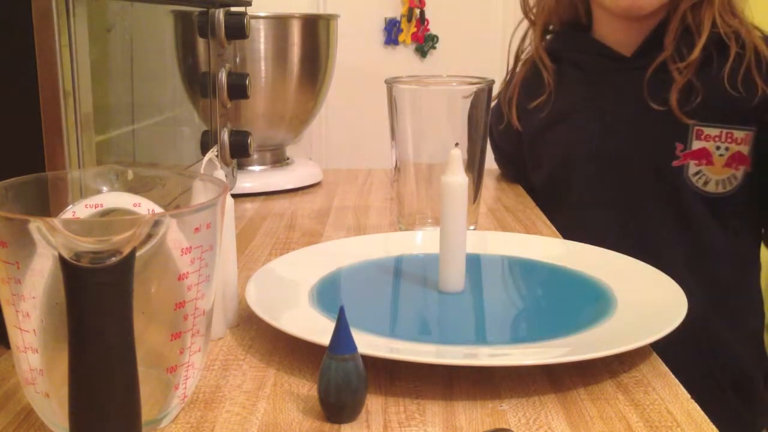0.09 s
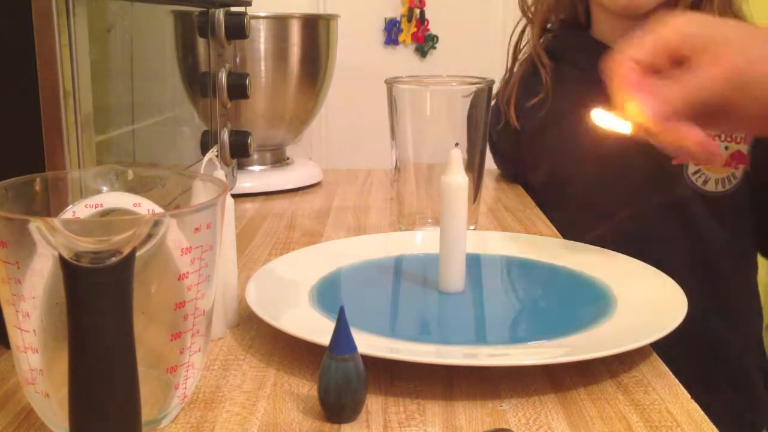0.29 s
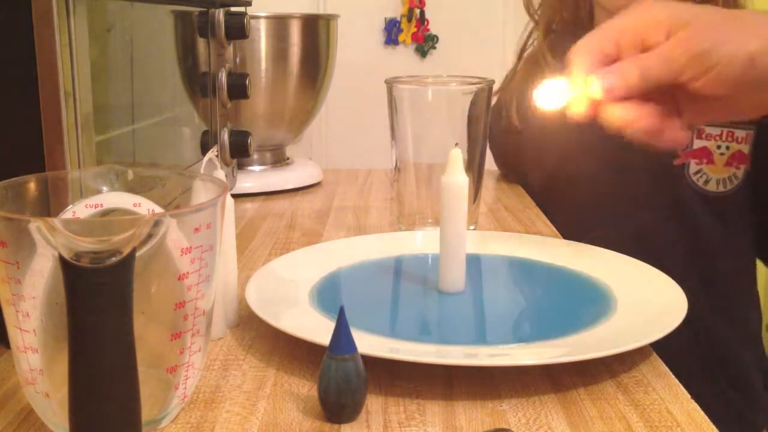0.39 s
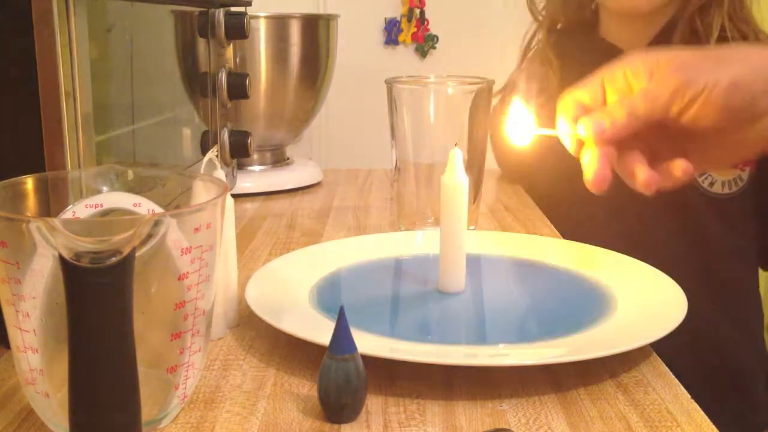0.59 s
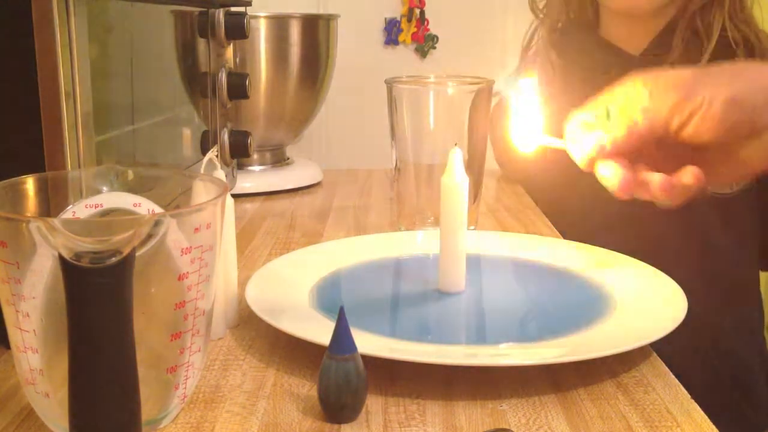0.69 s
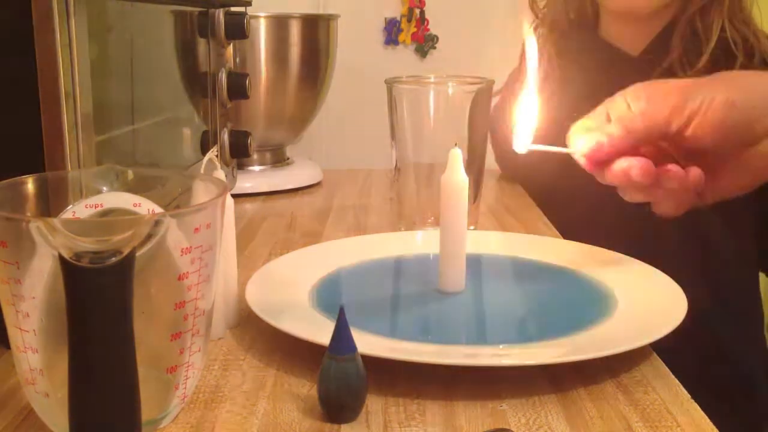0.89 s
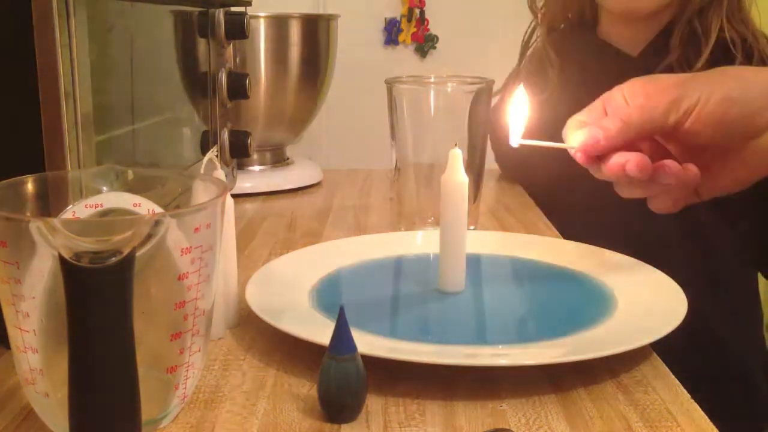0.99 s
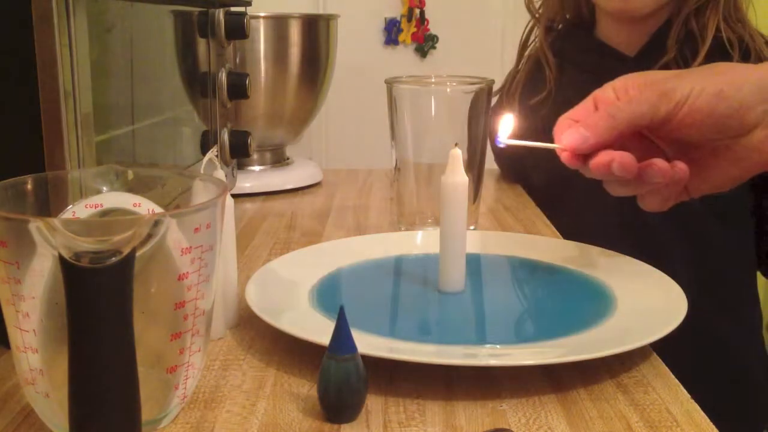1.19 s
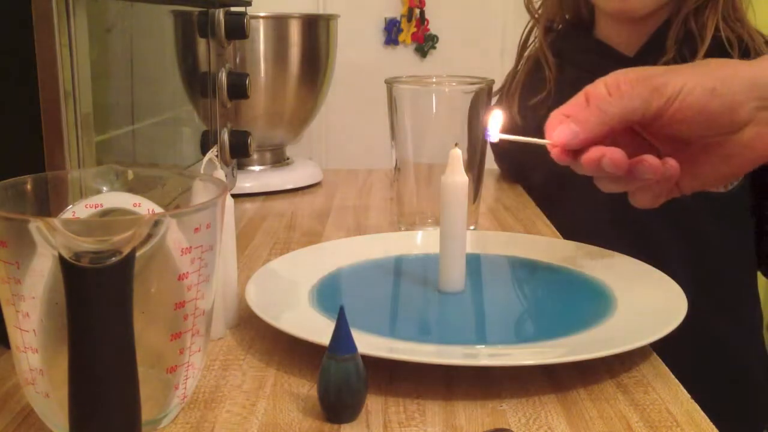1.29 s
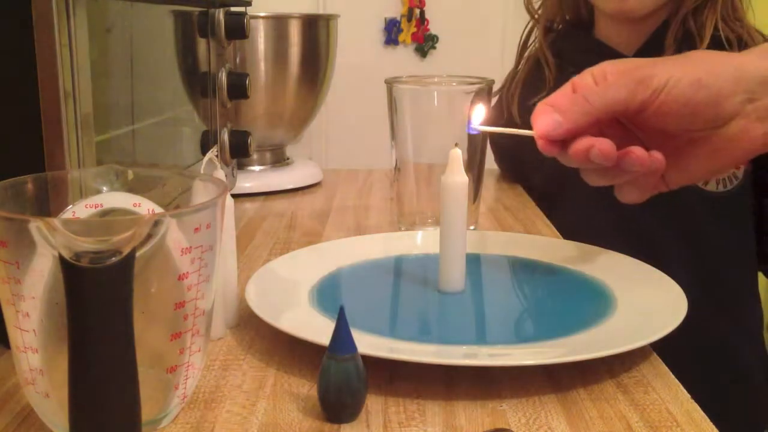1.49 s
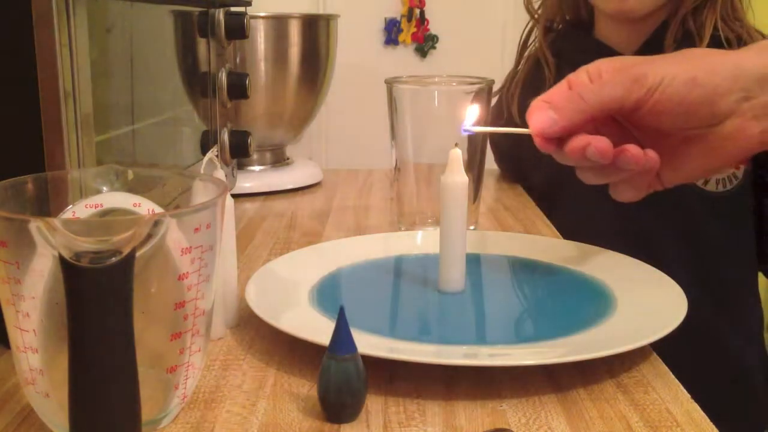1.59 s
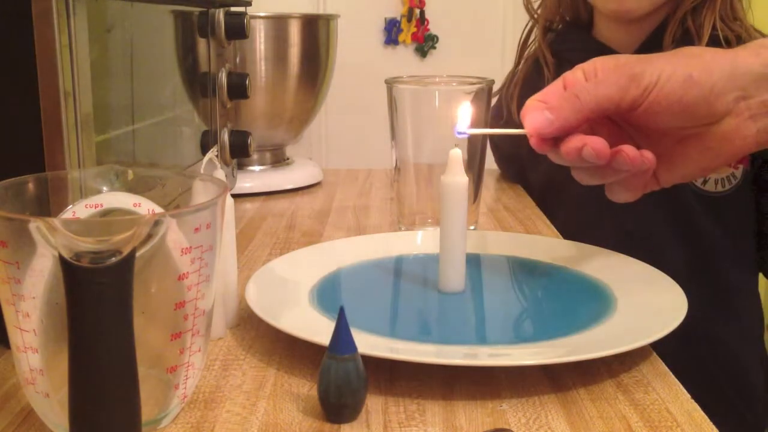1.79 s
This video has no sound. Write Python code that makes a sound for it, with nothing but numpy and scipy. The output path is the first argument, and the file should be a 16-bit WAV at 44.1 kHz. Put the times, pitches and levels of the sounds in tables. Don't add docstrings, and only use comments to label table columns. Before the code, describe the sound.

A match is struck with a quick gritty scratch, snaps alight and hisses briefly in a kitchen

```python
import sys
import numpy as np
from scipy import signal
from scipy.fft import rfft, irfft
from scipy.io import wavfile
from scipy.ndimage import uniform_filter1d

SR = 44100
rng = np.random.default_rng(int(sys.argv[2]) if len(sys.argv) > 2 else 0)


def generate_wav(sig):
    pcm = np.round(np.clip(np.atleast_2d(sig).T, -1, 1) * 32767).astype(np.int16)
    wavfile.write(sys.argv[1], SR, pcm)


def volts(x):
    e = np.asarray(x, float) / 20
    return 10 ** e


N = 79380


def evened(x):
    return x / np.sqrt(np.mean(x ** 2) + 1e-20)


def read_table(points, hz):
    f, value = np.transpose(points)
    return np.interp(np.log(hz + 1), np.log(f + 1), value)


def envelope(points):
    t_s, level_db = np.transpose(points)
    return volts(np.interp(np.arange(N) / SR, t_s, level_db, left=-140, right=-140))


def colour(x, spectrum):
    hz = abs(np.fft.fftfreq(4096, 1 / SR))
    log_gain = np.log(volts(read_table(spectrum, hz)))
    taps = np.fft.ifft(np.exp(np.conj(signal.hilbert(log_gain)))).real[:2048]
    return signal.oaconvolve(x, taps / np.linalg.norm(taps))[:len(x)]


def resonate(x, hz, width_hz):
    r = np.exp(-np.pi * width_hz / SR)
    pole = r * np.exp(2j * np.pi * hz / SR)
    return np.sqrt(2 * (1 - r * r)) * signal.lfilter([1], [1, -pole], x).real


def resonate_steep(x, hz, width_hz):
    twice = resonate(resonate(x, hz, width_hz), hz, width_hz)
    return twice * np.sqrt(2 * np.pi * width_hz / SR)


def drift(size):
    once = uniform_filter1d(rng.standard_normal(N), size)
    return evened(uniform_filter1d(once, size))


def add(mix, t_s, sound):
    part = mix[round(t_s * SR):][:len(sound)]
    part += sound[:len(part)]


# t/s, level/dB
STROKE = [
    (.187, -72),
    (.1945, -60),
    (.1957, -37),
    (.2015, -36),
    (.204, -33),
    (.215, -32),
    (.226, -33.5),
    (.234, -37),
    (.265, -56),
]
# f/Hz, width/Hz, level at start/dB, level at end of stroke/dB
BOX_MODES = [(313, 200, -36, -19.5), (853, 185, -56, -12), (1570, 640, -11, -16), (2070, 330, -13, -15.5),
             (3030, 740, 0, -8.5), (4125, 830, -6, -4.5), (5650, 840, -17, -16)]
# f/Hz, density/dB per Hz
GRIT_SPECTRUM = [(300, -45), (1200, -46), (2600, -21), (4200, 3.5), (6500, -6.5), (10000, -8.5),
                 (14500, -9), (15500, -40)]


def scratch():
    grit_per_s, spread_db = 9000, 2.5
    climb_s, bright_from_s, dull_db, bright_db = 0.028, .2022, -13, -2
    t = np.arange(N) / SR
    clicks = volts(spread_db * np.minimum(rng.exponential(1, N), 4)) * (rng.random(N) < grit_per_s / SR)
    grit = evened(clicks * rng.choice([-1., 1.], N)) * envelope(STROKE)
    along = np.clip((t - STROKE[1][0]) / climb_s, 0, 1)
    body = np.zeros(N)
    for hz, width_hz, start_db, end_db in BOX_MODES:
        body += resonate_steep(grit * volts(start_db + (end_db - start_db) * along), hz, width_hz)
    rasp = grit * volts(np.where(t < bright_from_s, dull_db, bright_db))
    return body + colour(rasp, GRIT_SPECTRUM)


# t/s, level/dB, body level/dB, decay/s
CRACKS = [
    (.2026, -18.5, -14, .0002),
    (.2272, -18, -3, .0007),
    (.2278, -15, -3, .0007),
    (.2288, -15, -3, .0008),
    (.2308, -25, -4, .0005),
    (.2512, -33, -14, .0002),
    (.3535, -41, -30, .01),
]
# f/Hz, density/dB per Hz
SNAP_SPECTRUM = [(110, -43.5), (250, -19.5), (900, -12), (2300, -8.5), (3600, -11), (5500, -12.5),
                 (12400, -19.5), (15500, -24)]


def cracks():
    full_above_db = -8
    out, t = np.zeros(N), np.arange(1500) / SR
    for t_s, level_db, body_db, decay_s in CRACKS:
        burst = rng.standard_normal(len(t)) * np.exp(-t / decay_s)
        burst = burst / np.linalg.norm(burst)
        body = sum(resonate_steep(burst, hz, w) * volts(end_db) for hz, w, _, end_db in BOX_MODES)
        spectrum = SNAP_SPECTRUM if body_db > full_above_db else GRIT_SPECTRUM
        add(out, t_s, volts(level_db + 9.5) * (colour(burst, spectrum) + volts(body_db) * body))
    return out


# t/s, level/dB
FLARE = [
    (.225, -70),
    (.24, -42.5),
    (.33, -62.5),
    (.42, -59),
    (.55, -58.5),
    (.65, -55.5),
    (.82, -55.5),
    (.9, -61),
    (.98, -92),
]
# f/Hz, density/dB per Hz
HISS_SPECTRUM = [(150, -27), (300, 0.5), (550, -5), (1800, -7), (3100, -10), (5600, -8.5), (6400, -11.5),
                 (15500, -19.5)]
# f/Hz, width/Hz, level/dB
JETS = [(818, 47, -12), (2160, 200, -15), (3780, 310, -11), (5050, 350, -10.5), (5850, 230, -19)]


def flare():
    sputter_db, patch_db, jet_flicker_db = 2, .6, 3
    flicker = volts(sputter_db * drift(size=12) + patch_db * drift(size=500))
    gas = evened(rng.standard_normal(N) * flicker)
    jets = np.zeros(N)
    for hz, width_hz, level_db in JETS:
        breath = rng.standard_normal(N) * volts(level_db + jet_flicker_db * drift(size=900))
        jets += resonate(breath, hz, width_hz)
    return envelope(FLARE) * (colour(gas, HISS_SPECTRUM) + jets)


# t/s, length/s, f/Hz, level/dB
SQUEAKS = [
    (0.359, 0.027, 5130, -46.5),
    (.371, 0.0074, 6400, -54),
    (.376, 0.032, 8000, -59.5),
    (.618, 0.022, 2175, -52),
    (.652, 0.034, 2160, -57),
    (.718, 0.022, 2160, -54.5),
    (.74, 0.011, 5050, -57),
]


def squeaks():
    out, t = np.zeros(N), np.arange(3000) / SR
    for t_s, length_s, hz, level_db in SQUEAKS:
        rough = resonate(rng.standard_normal(len(t)), hz, 400)
        tone = np.sin(2 * np.pi * hz * t) + .6 * rough
        fade = volts(level_db - 14 * (t / length_s) ** 2)
        add(out, t_s, fade * np.minimum(t / .0025, 1) * tone)
    return out


# t/s, level/dB, rise/s
STEPS = [(.0, -75.5, 0.011), (0.116, -66.5, 0.014), (.325, -58, 0.02), (0.394, -58.5, 0.021),
         (.47, -74, .02), (0.581, -65, .02), (0.664, -52, 0.019), (0.791, -66, 0.017), (0.959, -54.5, .022),
         (1.039, -61.5, .015), (1.229, -54.5, 0.012), (1.286, -61, 0.015), (1.366, -64, 0.013),
         (1.53, -68.5, 0.0084), (1.688, -69.5, 0.006)]
# f/Hz, width/Hz, level/dB
HOUSE_MODES = [(141.4, 30, -3), (186.8, 9.3, -2), (246.2, 30, -6), (362, 49, -9)]


def footsteps():
    t60_s, hold_s = 0.26, 0.014
    out, t = np.zeros(N), np.arange(SR // 3) / SR
    for t_s, level_db, rise_s in STEPS:
        noise = rng.standard_normal(2 * len(t))
        modes = sum(volts(db) * resonate(resonate(noise, hz, w), hz, 3 * w) for hz, w, db in HOUSE_MODES)
        boom = modes[len(t):]
        swing = np.sqrt(uniform_filter1d(boom ** 2, size=2200))
        decay = volts(-60 * np.maximum(t - rise_s - hold_s, 0) / t60_s)
        shape = np.minimum(t / rise_s, 1) ** 2 * decay
        add(out, t_s, volts(level_db) * shape * boom / swing)
    return out


# f/Hz, t60/s
ROOM_T60 = [(200, 0.1), (800, 0.2), (2000, 0.38), (4000, 0.34), (8000, 0.24), (15000, 0.15)]


def kitchen(x):
    taps = np.zeros(SR // 2)
    at = np.arange(100, len(taps) - 12, 12)
    taps[at + rng.integers(0, 12, len(at))] = rng.choice([-1., 1.], len(at))
    hz, t, z = signal.stft(taps, SR, nperseg=256)
    decay = volts(-60 * t / read_table(ROOM_T60, hz)[:, None])
    tail = signal.istft(z * decay, SR, nperseg=256)[1]
    return signal.fftconvolve(x, tail / np.linalg.norm(tail))[:N]


# f/Hz, density/dB per Hz
FLOOR_SPECTRUM = [(18, -63), (30, -22.5), (243, 1), (808, -15.5), (874, -14.5), (1400, -20), (2690, -15),
                  (15500, -18)]


def noise_floor():
    level_db = -65.5
    gain = volts(read_table(FLOOR_SPECTRUM, np.fft.rfftfreq(N, 1 / SR)))
    return volts(level_db) * evened(irfft(rfft(rng.standard_normal(N)) * gain, N))


def scene():
    strike_wet_db, flare_wet_db, squeak_wet_db = -7, -6.5, -13
    strike, gas, whistles = scratch() + cracks(), flare(), squeaks()
    sent = volts(strike_wet_db) * strike + volts(flare_wet_db) * gas + volts(squeak_wet_db) * whistles
    return (strike + gas + whistles + kitchen(sent) + footsteps() + noise_floor())[None]


def low_pass(x):
    return signal.sosfilt(signal.butter(12, 16280, fs=SR, output="sos"), x)


def record(dry):
    ceiling, bass_cut_hz, edge_hz = .4, 85, 15260
    rounded = ceiling * np.tanh(dry / ceiling)
    bass_cut = signal.butter(2, bass_cut_hz, "highpass", fs=SR, output="sos")
    band_limit = signal.firwin(301, edge_hz, window=("kaiser", 7), fs=SR)
    mix = signal.oaconvolve(signal.sosfilt(bass_cut, rounded), band_limit[None], "same")
    return low_pass(mix)


dry = scene()
out = record(dry)
generate_wav(out)
```